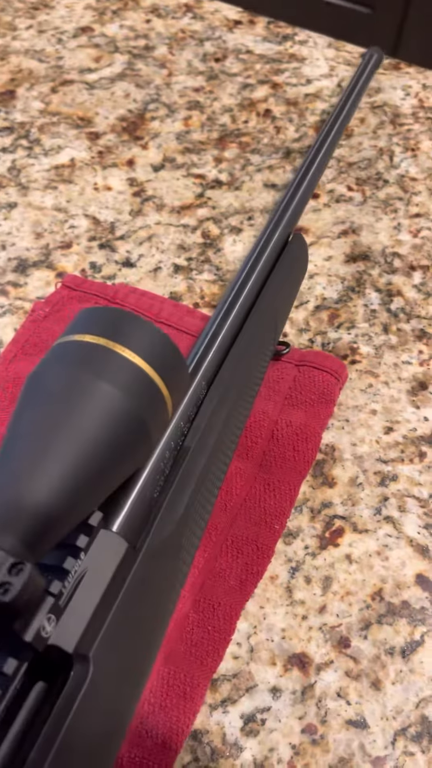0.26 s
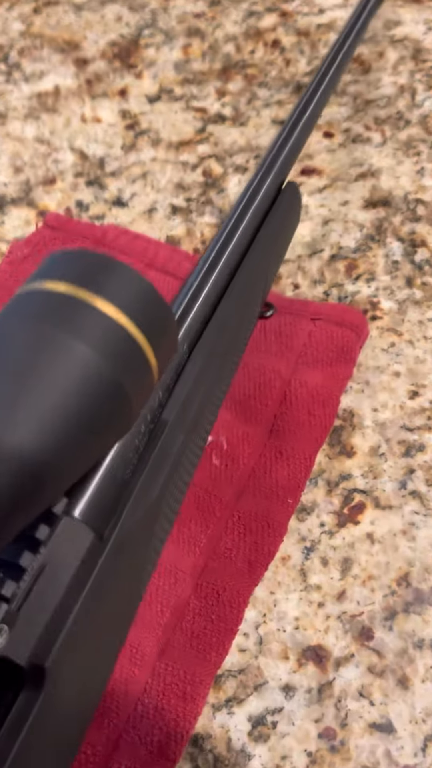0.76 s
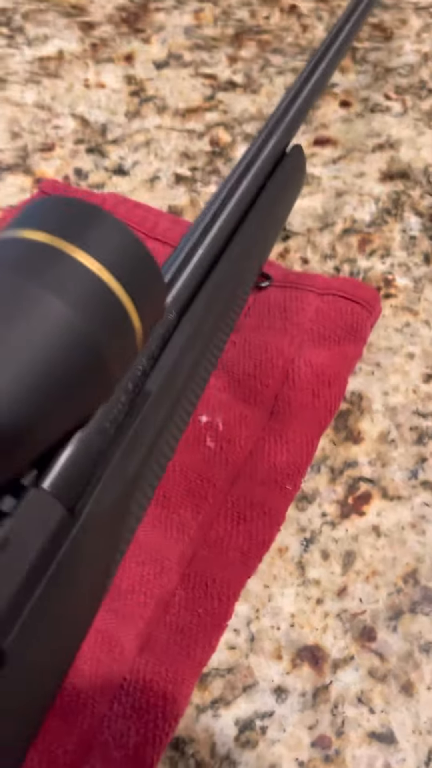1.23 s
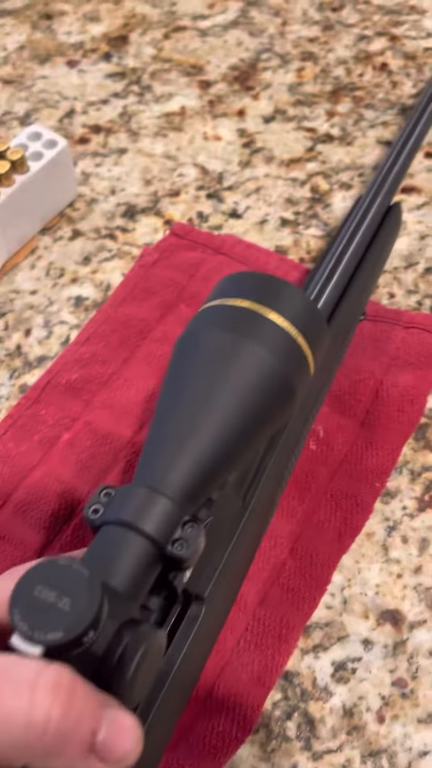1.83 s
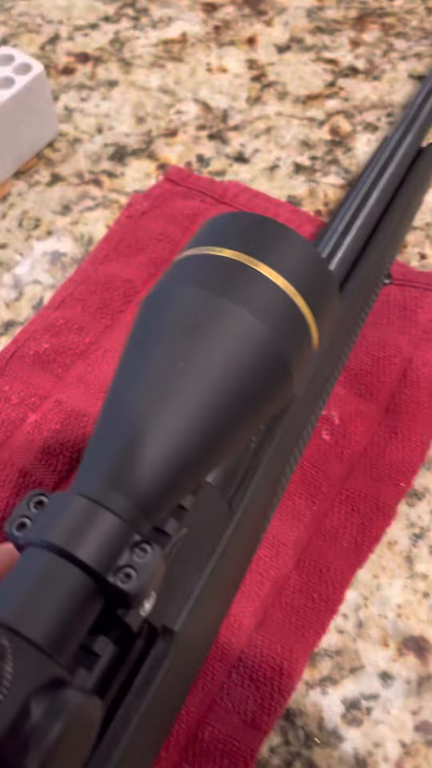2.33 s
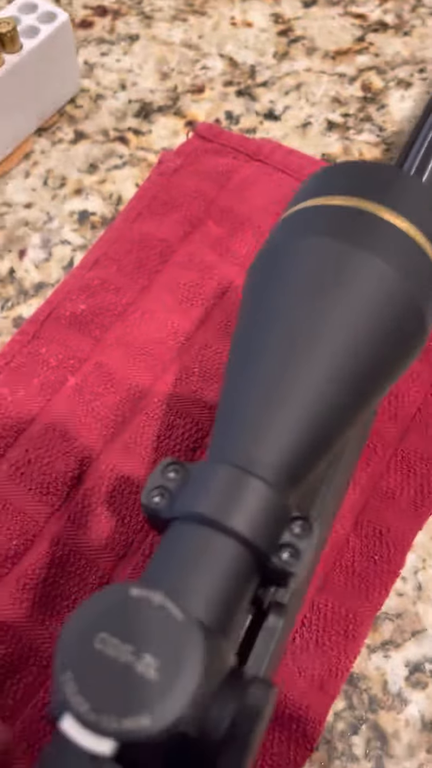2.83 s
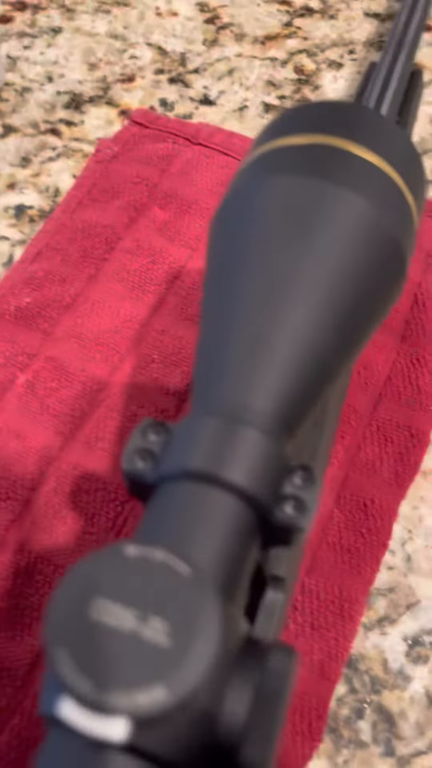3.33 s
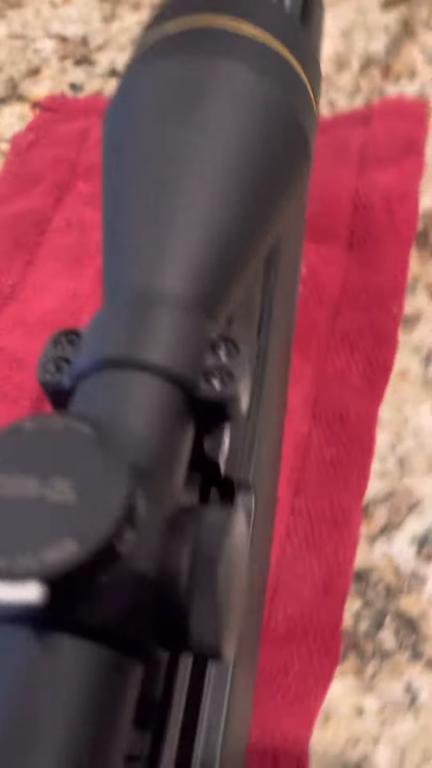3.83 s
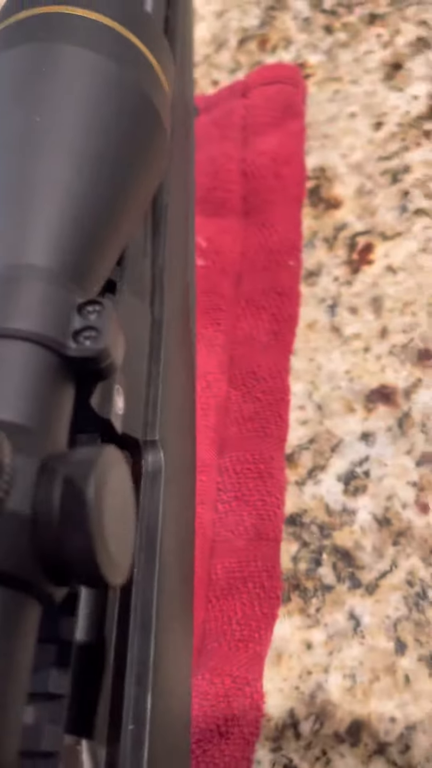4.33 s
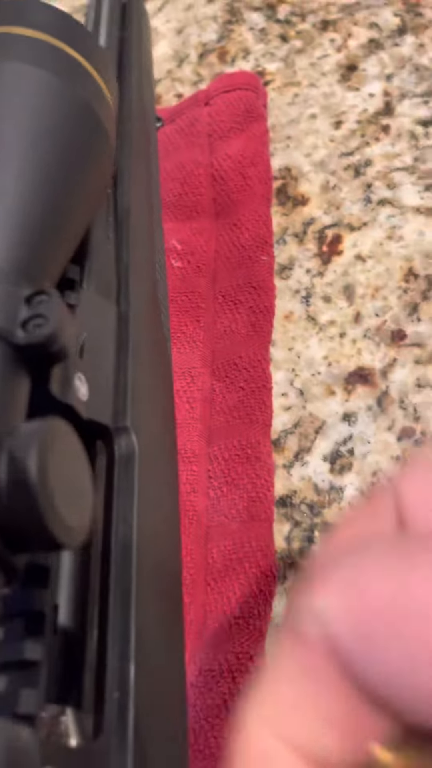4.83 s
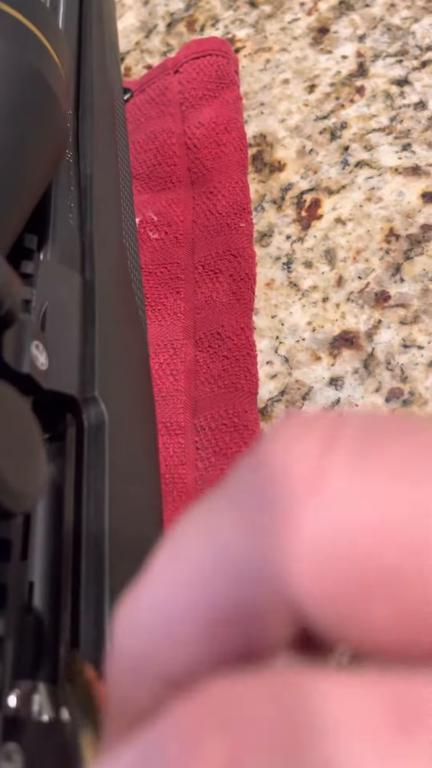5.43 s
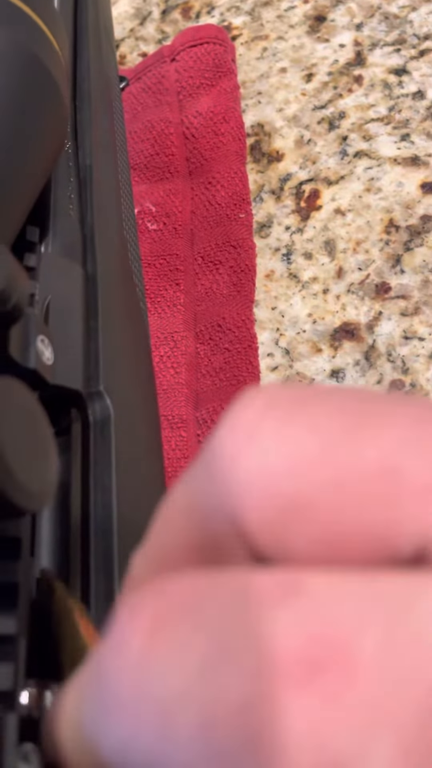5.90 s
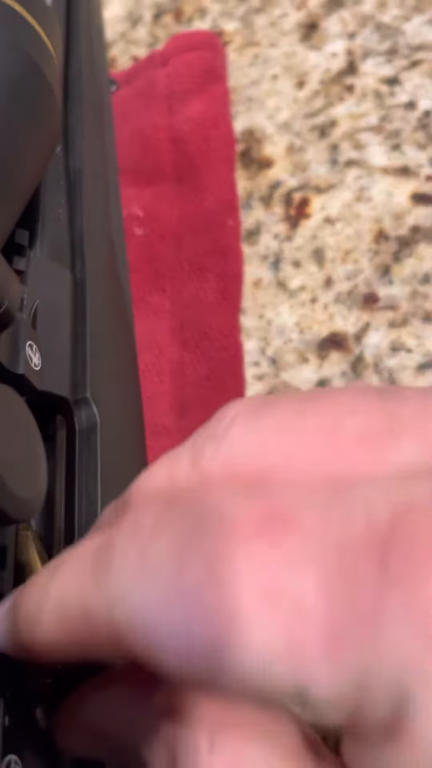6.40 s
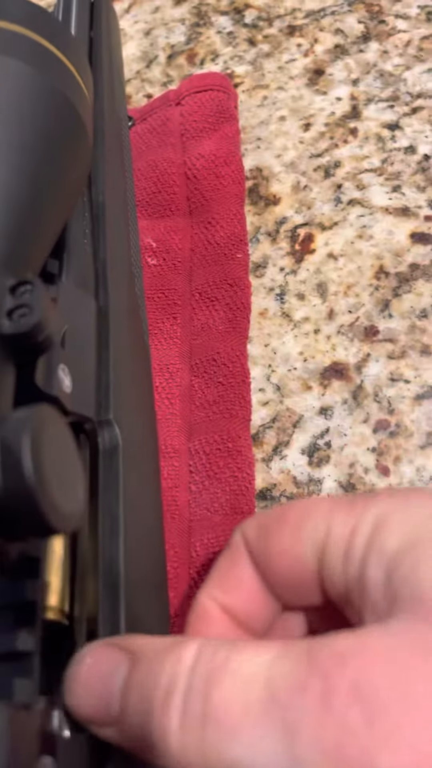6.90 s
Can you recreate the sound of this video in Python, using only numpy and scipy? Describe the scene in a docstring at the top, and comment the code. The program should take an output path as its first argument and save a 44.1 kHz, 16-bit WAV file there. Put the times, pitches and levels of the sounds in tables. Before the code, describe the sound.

A faint low appliance hum and soft room air run throughout a small, lightly echoing kitchen, heard close on a phone microphone. At about 0.5 s a hollow stock knocks quietly on the towel-covered counter, with a few quick, weaker bumps until 1.2 s. From 1.4 to 4.2 s hands and sleeves rustle faintly, airy hiss mixed with coarse rubbing, strongest around 1.8 to 3 s, with small muted bumps near 3.1 to 3.3 s. Near silence follows, with slight brushes at 4.6 to 5.3 s. A light tick at 5.5 s leads to a loud, bright brass-on-steel clack at 5.75 s, with a thin buzz. More clicks and slides cluster from 6.0 to 6.3 s, then a denser, duller run of clacks and short scrapes from 6.45 to 6.6 s, dwindling to small ticks by 6.87 s. A soft thud comes at 7.1 s over the hum.

```python
"""A bolt-action rifle lies on a towel on a stone kitchen counter; appliances hum nearby.
The stock knocks on the counter and the brass cartridge clicks, buzzes and scrapes in the steel action:
noisy chatter or dense slips drive banks of decaying modes, and a banded noise echo adds the kitchen.
Hands and sleeves rustle as fluttering coloured noise; appliances are steady tones over room air.
A close two-port phone microphone turns the phase between its ports and cuts the top."""
import sys
import numpy as np
from scipy import signal
from scipy.fft import rfft, irfft
from scipy.io import wavfile
from scipy.ndimage import uniform_filter1d

SR = 44100
rng = np.random.default_rng(int(sys.argv[2]) if len(sys.argv) > 2 else 0)


def inscribe(sig):
    """Save sig as 16-bit PCM at rate SR to the path in sys.argv[1].

    A 1-D sig is mono; a 2-D sig holds one channel per row.
    Samples are clipped to [-1, 1] before scaling.
    """
    pcm = np.round(np.clip(np.atleast_2d(sig).T, -1, 1) * 32767)
    wavfile.write(sys.argv[1], SR, pcm.astype(np.int16))


N = 315622


def from_db(db):
    """Decibels to gain."""
    return 10 ** (np.asarray(db) / 20)


def rms_one(x):
    """Scale to unit rms."""
    return x / np.sqrt(np.mean(x ** 2) + 1e-20)


def in_time(rows):
    """Interpolate rows of (time in seconds, values...) to every sample, one curve per value."""
    time_s, *columns = np.transpose(rows)
    return [np.interp(np.arange(N) / SR, time_s, column) for column in columns]


def at_hz(points, hz):
    """Read a spectrum on a log-frequency axis."""
    points = np.array(points)
    return np.interp(np.log(hz), np.log(points[:, 0]), points[:, 1])


def band(x, low_hz, high_hz, order):
    """Butterworth band-pass."""
    return signal.sosfilt(signal.butter(order, [low_hz, high_hz], "band", fs=SR, output="sos"), x)


def gate(spans):
    """Softly open during each (start, end) in seconds."""
    t = np.arange(N) / SR
    is_open = sum(1. * (t > start) * (t < end) for start, end in spans)
    return uniform_filter1d(is_open, size=400)


def drift(rate_hz):
    """Slow random wander of spread 1: low-passed noise made at a fortieth of the sample rate."""
    pole = np.exp(-80 * np.pi * rate_hz / SR)
    noise = rng.standard_normal(N // 40 + 2002)
    slow = signal.lfilter([1], [1, -2 * pole, pole * pole], noise)[2000:]      # skip the filter's start
    return np.interp(np.arange(N) / 40, np.arange(len(slow)), rms_one(slow))


# how alike diffuse noise is in the two ports: pitch_hz, correlation (0 to 1)
PORT_LIKENESS = [(100, 1), (300, 0.85), (900, 0.033), (1800, 0.85), (3500, 0.56), (4600, 0.39), (6000, 1),
                 (7500, 0.93), (9000, 1), (12000, 0.9)]


def coloured(spectrum):
    """Steady stereo noise of a given spectrum, partly alike in both ports; rms 1."""
    hz = np.maximum(np.arange(N // 2 + 1) * SR / N, 1)
    mid, side = rfft(rng.standard_normal((2, N))) * from_db(at_hz(spectrum, hz))
    alike = np.clip(at_hz(PORT_LIKENESS, hz), 0, .993)
    shared = np.sqrt(1 + alike) * mid
    opposed = np.sqrt(1 - alike) * side * [[1], [-1]]
    return rms_one(irfft(shared + opposed, N))


def tilted(colour, knee_hz, depth_db, bright_db):
    """Lean a colour: depth_db per octave going down from the knee, bright_db per octave going up."""
    octaves = np.log2(np.array(colour)[:, 0] / knee_hz)
    lean_db = np.where(octaves < 0, -depth_db, bright_db) * octaves
    return np.array(colour) + np.outer(lean_db, [0, 1])


def add(out, start_s, peak_db, modes, colour, chatter_ms, rise_ms, spread_db, crack_db, first_db):
    """One blow: a first contact and its dying chatter drive every mode, each with a strength of its own."""
    hz, mode_db, t60_s = np.transpose(modes)[:, :, None]
    t = np.arange(int(SR / 8)) / SR
    pitch_luck, level_luck = rng.standard_normal((2, len(modes), 1))

    swell = 1 - np.exp(-1.5 * hz * t)      # a mode takes about a cycle to build up
    ring = from_db(-60 * t / t60_s)
    crack = from_db(crack_db - 60 * t * hz / 5.14)      # falls 60 dB in about five cycles
    polarity = (-1) ** np.arange(len(modes))[:, None]
    rings = np.sin(2 * np.pi * hz * (1 + 0.016 * pitch_luck) * t) * (ring + crack) * swell * polarity
    rings /= np.linalg.norm(rings, axis=1, keepdims=True)      # equal energy before levels
    strength = from_db(mode_db + at_hz(colour, hz) + spread_db * level_luck)
    body = np.sum(strength * rings, axis=0)

    chatter = rng.standard_normal(len(t)) * from_db(-60000 * t / np.maximum(chatter_ms, .3))
    chatter *= 1 - np.exp(-1000 * t / np.maximum(rise_ms, .05))
    chatter[0] = from_db(first_db)      # the first contact
    blow = signal.fftconvolve(chatter, body)
    loudest = np.sqrt(np.max(uniform_filter1d(blow ** 2, size=130)))      # rms of the loudest 3 ms
    at = round(start_s * SR)
    out[at:at + len(blow)] += from_db(peak_db) * blow[:N - at] / loudest


# steady motor and mains tones: pitch_hz, level_db (rms)
HUM_TONES = [(56.6, -73), (109, -62), (113, -63), (120, -58), (164, -76), (218, -77), (274, -77),
             (11200, -98)]
# spectrum of room air and far machines, relative: pitch_hz, density_db (per Hz)
AIR_SPECTRUM = [(24, -20), (40, -11.5), (62, -3.5), (135, -6.5), (310, -11.5), (650, -19), (1200, -32.5),
                (2500, -39.5), (6000, -47), (11000, -45), (12000, -52), (13300, -68.5)]
AIR_DB = -60.5   # rms before its slow drift


def appliances():
    """Motor and mains tones beat over drifting room air; small phase leads alternate between ports."""
    t = np.arange(N) / SR
    tones = 0
    for k, (pitch_hz, level_db) in enumerate(HUM_TONES):
        lead_rad = 0.055 * (-1) ** k * np.array([[1], [-1]])
        phase = 2 * np.pi * (pitch_hz * t + rng.random()) + lead_rad
        tones = tones + np.sqrt(2) * from_db(level_db) * np.sin(phase)
    air_level = from_db(AIR_DB + 1.1 * drift(0.57))
    return tones + air_level * coloured(AIR_SPECTRUM)


# stock on counter, before the band limit: start_s, level_db (loudest 3 ms), pitch_hz (favoured),
# depth_db (per octave going down from it), bright_db (per octave going up from it)
STOCK_KNOCKS = [(0.513, -30.5, 1590, -2, -9.5), (0.577, -37, 1580, -0.5, -17),
                (0.624, -37.5, 1510, -0.5, -32), (0.652, -41, 603, -1.5, -9.5),
                (0.678, -36.5, 630, -10, -7.5), (0.768, -51, 1400, 1.5, -22), (0.962, -48.5, 597, -1, -8),
                (1.062, -53.5, 1390, -6, -41), (1.099, -59.5, 606, 1, -8), (1.236, -64.5, 1500, 0, -14),
                (1.576, -64, 2200, -5, 1), (3.121, -46.5, 2270, -3, 1), (3.124, -48.5, 810, -20, -39),
                (3.224, -47.5, 2250, 1, -8), (3.226, -54, 850, -36, -23), (3.242, -44.5, 337, -4, -2),
                (3.262, -50, 300, -7, -14), (4.282, -54.5, 536, -8, -28), (4.82, -63, 825, -15, -35),
                (6.275, -39, 340, -11, -5.5), (7.08, -46, 200, -4, -12)]
# modes of the stock left free: pitch_hz, energy_db (relative), t60_s
STOCK_MODES = [(193, 1.5, 0.096), (341, -3, 0.1), (519, 1.5, 0.11), (615, 1.5, 0.096), (864, -3, 0.031),
               (1197, -1.5, 0.047), (1428, 2, 0.096), (1633, 5, 0.018), (2210, 2, 0.0038),
               (3090, -5.5, 0.00374), (3920, -2.5, 0.011), (4650, -6.5, 0.0062), (6190, -7, .004)]
GRIPPED_S, GRIPPED_RING = 3.0, 0.45   # from now on a hand damps the stock to this share of its ring time
# at -30 dB; chatter_ms is the time to fall 60 dB, rise_ms a time constant
KNOCK_CHATTER_MS, KNOCK_CHATTER_MS_PER_DB = 31.8, 1.5   # softer knocks drag on longer
KNOCK_RISE_MS, KNOCK_RISE_MS_PER_DB = 1, -0.12   # softer knocks rise faster


def knocks():
    """The hollow stock knocks on the counter through the towel; each spot favours its own pitch."""
    out = np.zeros(N)
    even = [(hz, 0) for hz, *_ in STOCK_MODES]
    for start_s, level_db, pitch_hz, depth_db, bright_db in STOCK_KNOCKS:
        softer_db = -30 - level_db
        ring_share = GRIPPED_RING if start_s > GRIPPED_S else 1
        modes = np.array(STOCK_MODES) * [1, 1, ring_share]
        colour = tilted(even, pitch_hz, depth_db, bright_db)
        chatter_ms = KNOCK_CHATTER_MS + KNOCK_CHATTER_MS_PER_DB * softer_db
        rise_ms = KNOCK_RISE_MS + KNOCK_RISE_MS_PER_DB * softer_db
        add(out, start_s, level_db, modes, colour, chatter_ms, rise_ms,
            spread_db=0.0, crack_db=9.0, first_db=-3.0)
    return band(out, 110, 7000, order=2)


# spectra of the two rubbing noises, relative: pitch_hz, density_db (per Hz)
FINE_SPECTRUM = [(3000, -19), (5000, -8), (7000, -4.5), (10000, 2), (11000, -0.5), (12000, -17),
                 (13500, -42)]
COARSE_SPECTRUM = [(350, 1), (700, -3), (1300, -7.5), (2000, -5), (3200, -8), (4200, -11), (6200, -34)]
# hands and sleeves on skin, stock and towel, before flutter: time_s, fine_hiss_db, coarse_rub_db
HANDLING_LEVELS = [(.52, -95, -63.5), (.72, -87.5, -76), (.95, -80, -69), (1.131, -100, -86),
                   (1.32, -90, -98), (1.38, -72, -74.5), (1.62, -85, -76), (1.79, -56.5, -62),
                   (1.9, -68, -68.5), (2.05, -76, -59), (2.24, -62, -57.5), (2.3, -55.5, -58.5),
                   (2.49, -58, -63), (2.57, -65, -67.5), (2.63, -50.5, -76), (2.84, -73.5, -71.5),
                   (2.96, -57.5, -66.5), (3.11, -70, -72), (3.28, -85, -69), (3.43, -89, -105),
                   (3.56, -69, -67.5), (3.87, -62.5, -64.5), (4.1, -85, -76), (4.32, -100, -100),
                   (4.85, -82, -104), (5.05, -75.5, -86), (5.28, -72.5, -71.5), (5.46, -69, -84),
                   (5.529, -73, -58), (5.61, -68, -60.5), (5.72, -85, -80)]
# short brushes of a finger or cuff, before flutter: middle_s, length_s, fine_hiss_db, coarse_rub_db
CUFF_BRUSHES = [(1.24, 0.023, -98, -82), (1.46, 0.08, -75, -92), (1.754, .02, -52.5, -70),
                (1.941, .05, -64.5, -86), (2.197, 0.017, -55, -63), (3.368, 0.092, -73, -84),
                (4.16, 0.074, -73, -91), (4.275, 0.048, -66, -70), (4.585, 0.076, -64, -104),
                (4.745, 0.097, -55.5, -69), (4.904, 0.058, -73, -77), (5.007, 0.091, -61.5, -70),
                (5.088, 0.073, -66, -68), (5.252, 0.01, -73, -62)]
BRUSH_EDGE_DB = -20.5   # either end of a brush's length, relative to its middle


def rustle():
    """Fine and coarse rubbing noise, fluttering as fibres catch; brushes swell and fade on top."""
    t = np.arange(N) / SR
    moving = gate([(HANDLING_LEVELS[0][0], HANDLING_LEVELS[-1][0])])
    fine, coarse = from_db(in_time(HANDLING_LEVELS)) * moving
    for middle_s, length_s, fine_db, coarse_db in CUFF_BRUSHES:
        swell = from_db(BRUSH_EDGE_DB * (2 * (t - middle_s) / length_s) ** 2)
        fine = fine + from_db(fine_db) * swell
        coarse = coarse + from_db(coarse_db) * swell
    hiss = coloured(FINE_SPECTRUM) * fine * from_db(1.16 * drift(60))
    rub = coloured(COARSE_SPECTRUM) * coarse * from_db(2.3 * drift(18))
    return hiss + rub


# brass on steel, before the band limit: start_s, level_db (loudest 3 ms),
# depth_db (per octave going down from the knee), bright_db (per octave going up), chatter_ms (to fall 60 dB)
BRASS_CLICKS = [(1.746, -72, 17, -10, 6.6), (2.192, -47.5, -19, -4.5, 9.6), (2.416, -114, -23, -11, 11),
                (5.248, -46, 17, 22, 6.2), (5.51, -30, -1, 2, 8), (5.526, -47.5, 20.5, 5, 7.2),
                (5.565, -46, 11.5, 1.5, 29), (5.644, -49, -8, -4, 8.9), (5.747, -14, -6.5, 3.5, 8.6),
                (5.759, -8.5, -3.5, 9, 3.8), (5.763, -20, -12, 2.5, 6.2), (6.018, -20.5, -6, 8, 6.7),
                (6.028, -39, -19, 0.5, 34), (6.1, -24.5, -17, 5, 11), (6.127, -15.5, -10, 4.5, 14),
                (6.138, -16.5, 6, 8, 6.2), (6.168, -30, 7, -8, 2.8), (6.243, -14.5, -8, 3.5, 8.8),
                (6.273, -10, -15, 4.5, 8.8), (6.289, -23.5, -8.5, 1.5, 22), (6.435, -47, -11, -6, 8.9),
                (6.466, -28, 2.5, -7, 16), (6.479, -34.5, -4.5, -5.5, 9.9), (6.487, -22.5, -5, -9.5, 11),
                (6.497, -27, -15, -7.5, 4.6), (6.507, -16.5, -5, -3, 8.4), (6.516, -11, -6.5, -4.5, 9.6),
                (6.553, -11, -3, -3.5, 14.4), (6.602, -27.5, -10, -11.5, 4.7), (6.661, -20, -12, -7, 13),
                (6.686, -25.5, -16, -5.5, 6.8), (6.702, -38.5, -12.5, -7.5, 9.6),
                (6.723, -26.5, 5.5, -8, 2.4), (6.741, -27.5, -28, -8.5, 5.5), (6.753, -32.5, -8, -9.5, 6.8),
                (6.793, -29, 16, -8, 7.3), (6.801, -29.5, -8, -10, 10), (6.81, -31.5, -28, -9.5, 16),
                (6.834, -37, -11.5, -10, 9), (6.846, -40, -17, -11.5, 8), (6.867, -47, 2.5, 4, 8)]
# modes of action and cartridge: pitch_hz, energy_db (relative), t60_s (ring of a click)
ACTION_MODES = [(609.6, -7, 0.029), (728, -1.5, 0.029), (951, -1, 0.014), (1115, -1.5, 0.04),
                (1392, 1, 0.042), (1645, -1.5, 0.061), (1873, -1.5, 0.04), (2158, 1, 0.035),
                (2372, 1, 0.036), (2765, 1, 0.03), (3232, 0.5, 0.02), (3620, 1, 0.0093), (4335, 1.5, 0.011),
                (5050, 0, 0.01), (5750, -0.5, 0.015), (6410, 1.5, 0.0059), (7470, 1, 0.0048),
                (7630, 2, 0.0072), (9090, 5, 0.0034), (10580, 3.5, 0.0052), (11720, -4, 0.0024),
                (11800, -12.5, 0.0045), (14400, -24.5, 0.0031)]
# colour of clicks before each one's tilt, cartridge loose and then seated: pitch_hz, level_db (relative)
LOOSE_CLICK_COLOUR = [(800, 0.2), (1600, -1), (3500, -1.6), (6500, -7), (10000, 5.5), (13000, 2.1)]
SEATED_CLICK_COLOUR = [(800, 0), (1600, 1.1), (3500, -1.5), (6500, -0.5), (10000, -2.5), (13000, 11)]
CLICK_KNEE_HZ = 1562
SEATED_S = 6.4   # from now on the cartridge lies in the feed lips


def clicks():
    """The cartridge strikes the action and rings its modes; where it strikes sets the colour."""
    out = np.zeros(N)
    for start_s, level_db, depth_db, bright_db, chatter_ms in BRASS_CLICKS:
        plain_colour = LOOSE_CLICK_COLOUR if start_s < SEATED_S else SEATED_CLICK_COLOUR
        colour = tilted(plain_colour, CLICK_KNEE_HZ, depth_db, bright_db)
        add(out, start_s, level_db, ACTION_MODES, colour, chatter_ms, rise_ms=0.11,
            spread_db=-0.5, crack_db=19.0, first_db=9.0)
    return out


# the brass case buzzes on after a free blow, before the band limit:
# start_s, level_db (loudest 3 ms), pitch_hz (strongest), chatter_ms (to fall 60 dB)
CASE_BUZZES = [(5.748, -30.5, 3700, 18), (5.759, -39.5, 3670, 130), (6.019, -47.5, 1690, 470),
               (6.244, -24.5, 3380, 12), (6.274, -28, 3350, 12)]
# modes of the case: pitch_hz, energy_db (relative), t60_s
CASE_MODES = [(1680, 0.1, .04), (1740, 2.8, .04), (3350, 3, 0.011), (3600, 0, 0.027), (3730, 0, 0.04)]
CASE_FALL_DB = 59.5   # per octave away from the strongest pitch


def case():
    """Thin brass keeps buzzing against the steel in a few partials."""
    out = np.zeros(N)
    even = [(hz, 0) for hz, *_ in CASE_MODES]
    for start_s, level_db, pitch_hz, chatter_ms in CASE_BUZZES:
        colour = tilted(even, pitch_hz, -CASE_FALL_DB, -CASE_FALL_DB)
        add(out, start_s, level_db, CASE_MODES, colour, chatter_ms, rise_ms=0.13,
            spread_db=-1.0, crack_db=7.5, first_db=3.0)
    return out


# cartridge sliding on the feed lips, before the band limit:
# start_s, length_s, first_db, last_db, bright_db (per octave)
LIP_SCRAPES = [(6.03, 0.14, -54.5, -42.5, 1.5), (6.178, 0.15, -48, -49, -8.5), (6.312, 0.13, -44, -58, 2),
               (6.428, 0.035, -44.5, -47, -1), (6.466, 0.054, -45, -26.5, -6.5),
               (6.515, 0.015, -41.5, -44, -9.5), (6.568, 0.015, -40.5, -53, -11.5),
               (6.597, 0.017, -36, -70, -0.5), (6.637, .022, -61, -48, -6), (6.677, 0.023, -28, -38, -7),
               (6.709, 0.046, -46, -29.5, -6.5), (6.763, .024, -56, -57, -5), (6.797, 0.1, -29.5, -63, -8)]


def scrape():
    """Dense uneven slips of either sign excite the modes of the action."""
    ends = []
    for start_s, length_s, first_db, last_db, tilt_db in LIP_SCRAPES:
        ends += [(start_s, first_db, tilt_db), (start_s + length_s, last_db, tilt_db)]
    level_db, bright_db = in_time(ends)

    happens = rng.random(N) < 3000 / SR      # about 3000 slips a second
    strength = from_db(1.2 * np.minimum(rng.exponential(1, N), 4))
    slips = happens * strength * rng.choice([-1, 1], N)
    out, power = 0, 0
    for k, (pitch_hz, energy_db, t60_s) in enumerate(ACTION_MODES):
        r = from_db(-120 / (t60_s * SR))      # the pressing thumb halves the ring
        w = 2 * np.pi * pitch_hz / SR
        rings = signal.lfilter([0, np.sin(w)], [1, -2 * r * np.cos(w), r * r], slips + 1e-18)
        share = from_db(energy_db + bright_db * np.log2(pitch_hz / 3000))
        out = out + (-1) ** k * share * rms_one(rings)
        power = power + share ** 2
    sliding = gate([(start_s, start_s + length_s) for start_s, length_s, *_ in LIP_SCRAPES])
    return out / np.sqrt(power) * from_db(level_db) * sliding


# kitchen echo by band: low_hz, high_hz, level_db (relative, at the start of the decay), t60_s
ECHO_BANDS = [(150, 520, -3.5, 0.9), (576, 1500, -8.5, 0.58), (1730, 3000, -15, 0.57),
              (2780, 6200, -14, 0.58), (5950, 11000, -16.5, 0.33)]


def kitchen(x):
    """A diffuse echo: stereo noise that fades in over 12 ms and dies band by band."""
    t = np.arange(SR) / SR
    noise = coloured([(100, 0), (14000, 0.021)])      # practically flat
    echo = 0
    for k, (low_hz, high_hz, level_db, t60_s) in enumerate(ECHO_BANDS):
        own_second = noise[:, k * SR:(k + 1) * SR]      # each band takes its own second of noise
        decay = from_db(level_db - 60 * t / t60_s)
        echo = echo + decay * band(own_second, low_hz, high_hz, order=2)
    echo = echo * np.clip(t / 0.012, 0, 1) / np.sqrt(SR / 20)
    return signal.fftconvolve(echo, x[None], axes=1)[:, :N]


def scene():
    """Rifle, hands, appliances and room."""
    metal = band(clicks() + case() + scrape(), 380, 12000, order=4)      # small parts radiate no bass
    rifle = metal + knocks()
    return rifle + kitchen(rifle) + rustle() + appliances()


# phase between the two ports: pitch_hz, left_lead_rad
PORT_LEAD = [(0, 0), (1800, 0), (2600, .3), (3600, .9), (4400, 1.6), (4850, 3.1), (5300, 5.0), (5900, 6.3),
             (9050, 9.42), (12200, 12.57), (13000, 12.9), (14000, 13.8), (22050, 13.8)]
CUTOFF_HZ = 16600   # 70 dB down from here up


def record(dry):
    """The ports differ in phase with frequency; the top is cut."""
    padded = np.pad(dry, [(0, 0), (1000, 1000)], "reflect")
    size = padded.shape[1]
    hz = np.arange(size // 2 + 1) * SR / size
    lead_rad = np.interp(hz, *np.transpose(PORT_LEAD))
    turn = np.exp(.5j * lead_rad * [[1], [-1]])      # half the lead forward left, half back right
    ports = irfft(rfft(padded) * turn, size)[:, 1000:-1000]
    return signal.sosfilt(signal.cheby2(12, 70, CUTOFF_HZ, fs=SR, output="sos"), ports)


dry = scene()
out = record(dry)
inscribe(out)
```